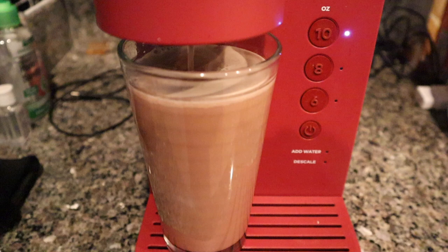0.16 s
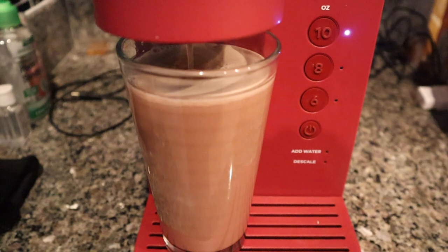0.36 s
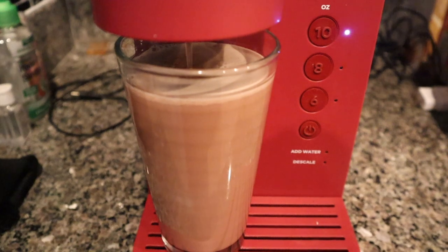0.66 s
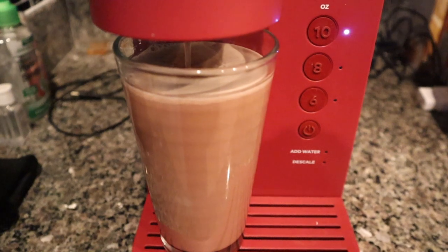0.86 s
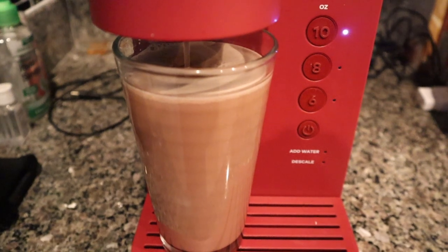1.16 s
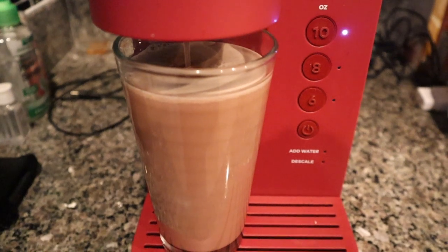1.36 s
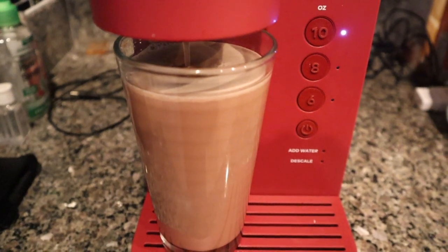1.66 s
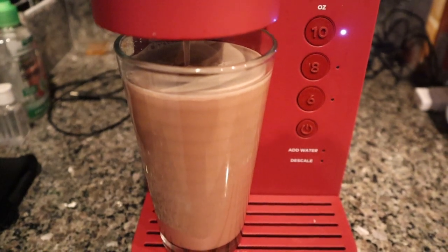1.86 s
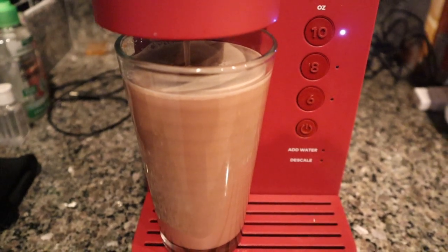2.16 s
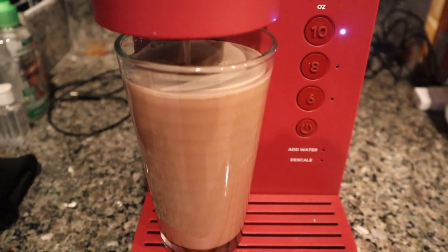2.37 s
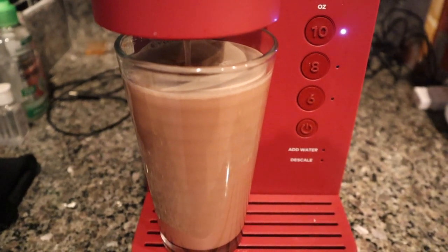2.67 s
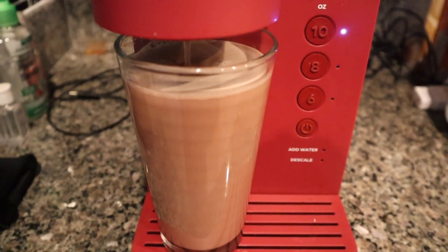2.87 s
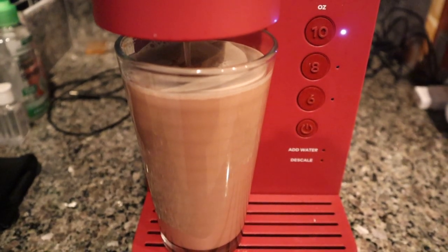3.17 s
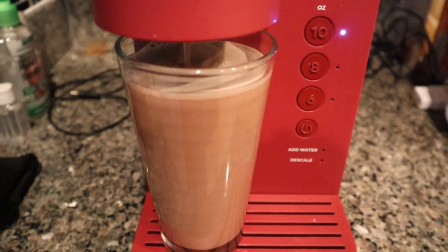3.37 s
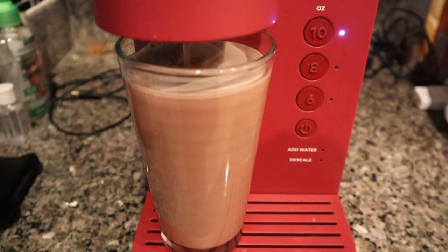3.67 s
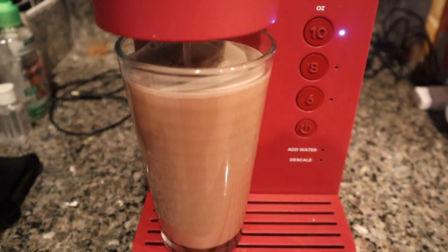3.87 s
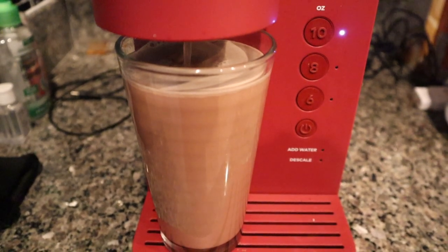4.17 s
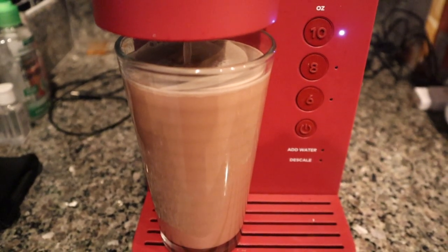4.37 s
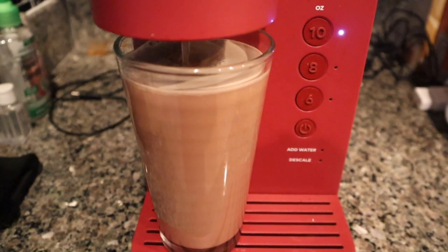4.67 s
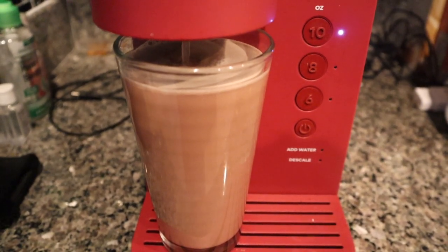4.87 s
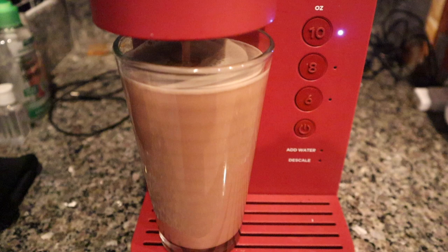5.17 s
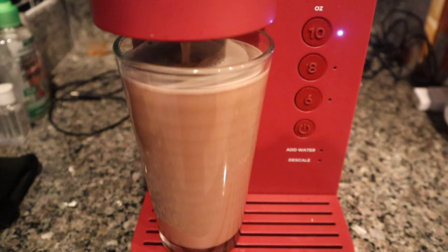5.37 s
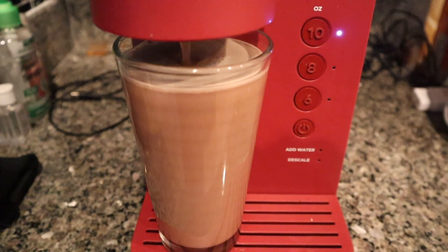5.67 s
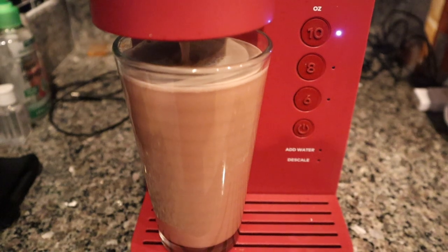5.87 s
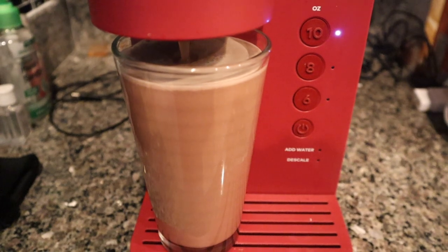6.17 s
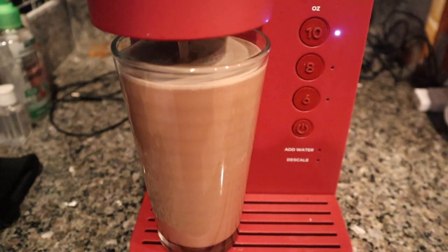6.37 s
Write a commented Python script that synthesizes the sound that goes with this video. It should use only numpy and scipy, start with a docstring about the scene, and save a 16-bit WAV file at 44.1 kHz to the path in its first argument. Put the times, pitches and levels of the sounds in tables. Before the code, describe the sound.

Close up, a coffee machine hums and dribbles drops into a glass, clicks, then whines loudly as air sputters and hisses from its spout.

```python
"""Pod coffee machine on a stone counter

A water pump with three valves knocks while the thin stream breaks into drops that tick and ring the glass.
A relay clicks, an air pump takes over with a throbbing whine, and the spout spits and gurgles.
Pumps and drops are timed clicks that ring resonances; the spout is shaped noise and short gliding tones.
The kitchen hums and rumbles behind. A two-port microphone stands close by.
"""
import sys
import numpy as np
from scipy import signal
from scipy.fft import rfft, irfft
from scipy.io import wavfile
from scipy.ndimage import uniform_filter1d

SR = 44100
rng = np.random.default_rng(int(sys.argv[2]) if len(sys.argv) > 2 else 0)


def master(y):
    """Save y as 16-bit WAV."""
    cut = np.clip(np.atleast_2d(y).T, -1, 1)
    pcm = np.round(cut * 32767)  # scale
    wavfile.write(sys.argv[1], SR, pcm.astype(np.int16))


N = 287071
T = np.arange(N) / SR  # time of every sample in seconds

# Rings of the air pump's case: pitch_hz, width_hz, level_db
AIR_CASE = [(922, 99, -1), (966, 50, 4), (1107, 104, 0), (1265, 101, -0.5), (1480, 110, -1),
            (1570, 153, -4.5), (1776, 110, -4.5)]
# Rings of loose plastic: pitch_hz, width_hz, level_db
RATTLE = [(1984, 183, 0.5), (2230, 200, 0), (2460, 83, -5), (2570, 60, -13.5)]
# Rings of the tank: pitch_hz, width_hz, level_db
BELLY = [(366, 103, -10), (558, 38, 3.5), (596, 93, 0), (763, 62, -2)]
# Gushes of air through froth at the spout: start_s, length_s, level_db
GUSHES = [(3.501, 0.99, -53.5), (4.756, 0.051, -48.5), (4.852, 0.13, -45.5), (5.014, 0.086, -37.5),
          (5.128, 0.17, -45), (5.263, 0.09, -46), (5.457, 0.041, -46), (5.541, 0.0089, -38),
          (5.61, 0.031, -37.5), (5.758, 0.041, -38), (5.834, 0.026, -40), (5.898, 0.053, -45.5),
          (6.018, 0.11, -40.5), (6.244, 0.05, -45), (6.335, 0.042, -44.5), (6.438, 0.05, -43)]


def gain_of(db):
    """Turns decibels into a gain."""
    return np.exp(np.asarray(db) * np.log(10) / 20)


def evened(x):
    """Scales a signal to rms 1."""
    return x / np.sqrt(np.mean(x ** 2) + 1e-20)


def read(points, hz):
    """Reads a spectrum table, with straight lines between its points on a log-frequency axis."""
    f, value = np.transpose(points)
    return np.interp(np.log(hz + 1), np.log(f + 1), value)


def curve(rows, count, silent=None):
    """One column of a time table at every sample; outside the table it holds or takes the silent value."""
    rows = np.array(rows)
    return np.interp(T, rows[:, 0], rows[:, count], silent, silent)


def ring(x, modes):
    """Things ring at their own pitches: two-pole resonances of alternating sign, scaled to rms 1."""
    total = 0
    for k, (hz, width, db) in enumerate(modes):
        b, a = signal.iirpeak(hz, hz / width, SR)
        total = total + (-1) ** k * gain_of(db) * signal.lfilter(b, a, x)
    return evened(total)


def slow(rate):
    """Slow chance: noise smoothed twice over 1 / rate seconds, scaled to rms 1."""
    size = int(SR / rate)
    once = uniform_filter1d(rng.standard_normal(N), size)
    return evened(uniform_filter1d(once, size))


def spread(alike):
    """Noise from a wide source: the two ports hear it only partly alike."""
    a, b = rng.standard_normal((2, N))
    alike = np.clip(alike, 0, 1)
    return np.array([a, alike * a + np.sqrt(1 - alike ** 2) * b])


def swell(s, half, db):
    """A bell-shaped rise and fall around its peak time."""
    return gain_of(db) * np.exp(-.5 * ((T - s) / half) ** 2)


def bursts(events, alike, rise):
    """Noise bursts with a quick front, each dying at its own speed."""
    shape = 0
    for s, db, t60 in events:
        fading = gain_of(db - 60 * np.abs(T - s) / t60)
        shape = shape + fading * np.clip((T - s) / rise, 0, 1)
    return shape * spread(alike)


def turns_of(speed, angle):
    """Shaft angle in turns: the summed speed, with the given angle at the table's first row."""
    turns = np.cumsum(curve(speed, count=1)) / SR
    return turns - turns[round(speed[0][0] * SR)] + angle


def knocks(turns, valves, spread_db, puff_s, puff_db, flow_db, alike):
    """A click at each valve's place in the turn, a puff of noise after it, and steady flow noise."""
    hits = 0
    for place, db in valves:
        passed = np.floor(turns - place)
        hits = hits + gain_of(db) * np.diff(passed, prepend=passed[0])
    hits = hits * gain_of(spread_db * rng.standard_normal(N))  # no two blows are equally strong
    puff_shape = signal.lfilter([1], [1, -np.exp(-1 / (puff_s * SR))], hits)
    puffs = puff_shape * spread(alike)
    return evened(hits) + gain_of(puff_db) * evened(puffs) + gain_of(flow_db) * spread(alike)


def orders(turns, table, waver_db):
    """Sines on whole multiples of the shaft speed, each swelling and fading a little."""
    total = 0
    for multiple, db in table:
        level = np.sqrt(2) * gain_of(db + waver_db * slow(9.2))
        total = total + level * np.sin(2 * np.pi * (round(multiple) * turns + rng.random()))
    return total


def kitchen():
    """Low rumble in a few room modes over a diffuse floor, and steady mains hum."""
    # Mains hum: pitch_hz, level_db
    hum_tones = [(120, -41), (240, -71.5)]
    # Room modes: pitch_hz, width_hz, relative level_db
    rumble_modes = [(59, 10.4, -6.5), (68.7, 8.7, -2), (85, 7, -7), (108.3, 9.4, -2.5), (718, 41, -24)]
    # Diffuse floor: pitch_hz, relative level_db per Hz
    floor_spectrum = [(20, -22), (45, -17), (150, -17.5), (300, -19), (700, -22.5), (1700, -25),
                      (4000, -34.5), (9000, -50), (12000, -42.5), (13500, -97), (16000, -90)]
    # Left-right likeness: pitch_hz, likeness (1 alike, 0 unrelated, -1 opposite)
    likeness = [(20, .99995), (60, .9998), (110, .999), (150, .99), (380, 0.75), (950, 0.64), (2380, -0.3),
                (5980, 0.9), (15000, -.9)]
    hz = np.fft.rfftfreq(N, 1 / SR)
    power = gain_of(read(floor_spectrum, hz)) ** 2
    for f, width, db in rumble_modes:
        power += gain_of(db) ** 2 / (1 + (2 * (hz - f) / width) ** 4)
    a, b = rfft(rng.standard_normal((2, N)))
    same = np.clip(read(likeness, hz), -1, 1)
    pair = np.array([a, same * a + np.sqrt(1 - same ** 2) * b])
    floor = evened(irfft(np.sqrt(power) * pair, N))
    hum = sum(np.sqrt(2) * gain_of(db) * np.sin(2 * np.pi * f * T) for f, db in hum_tones)
    return gain_of(-38) * floor, hum


def water_pump():
    """Three valves knock on their seats each turn; flow noise fills the case; the motor drones."""
    # Shaft speed: time_s, turns_per_s
    speed = [(0.0, 25.02), (0.42, 24.84), (0.84, 24.62), (1.26, 24.46), (1.68, 24.36), (2.1, 24.23),
             (2.52, 24.03), (2.94, 24.03), (3.07, 24.55), (3.3, 24.6), (3.4, 25.1)]
    # Valves: place_in_turn (0 to 1), level_db
    valves = [(.975, -6), (.29, -5), (.625, 0)]
    # Ring of a valve seat: pitch_hz, width_hz of one stage, level_db
    seat = [(1300, 480, 0)]
    # Rings of the case: pitch_hz, width_hz, level_db
    case_modes = [(340, 47, -12), (570, 57, 1), (693, 164, -3.5), (778, 61, 2.5), (1913, 52, -1)]
    # Running level of the whole pump: time_s, level_db
    running_level = [(0, 0), (1.5, -0.5), (3.3, -1), (3.5, 3), (3.56, -35)]
    # Motor tones: multiple of the shaft speed, level_db before the running level
    motor_tones = [(6, -46.5), (9, -58), (11, -61), (12, -62), (13, -61), (15, -55), (16, -52), (18, -57),
                   (20, -58), (21, -50), (22, -62), (23, -59), (28, -59), (29, -60), (32, -65), (35, -65),
                   (38, -65)]
    turns = turns_of(speed, angle=-.161)
    slack = .002 * slow(70)  # in turns: valves land a little early or late
    blows = knocks(turns + slack, valves, spread_db=.6, puff_s=.001, puff_db=-18, flow_db=-20, alike=.7)
    knock = ring(ring(ring(blows, seat), seat), seat)  # three stages round the knock
    filling = knocks(turns + .1, valves, spread_db=2.0, puff_s=.03, puff_db=4.1, flow_db=.17, alike=.84)
    case = ring(filling, case_modes)
    running = gain_of(curve(running_level, count=1))
    body = gain_of(-47) * knock + gain_of(-49.5) * case
    return running * body, running * orders(turns, motor_tones, waver_db=1.0)


def stream():
    """The stream pinches into drops at a wavering rate; each ticks and rings the glass."""
    # Loudness of the drops: time_s, level_db
    drop_level = [(0, -49.5), (.14, -44.5), (.17, -49), (.33, -46.5), (.45, -44), (.62, -48), (1.2, -48),
                  (1.5, -49.5), (1.84, -47), (2.18, -47.5), (2.22, -45), (2.45, -48), (3.01, -48.5),
                  (3.17, -43.5), (3.22, -47.5), (3.36, -45.5), (3.46, -51), (3.5, -46)]
    # Rings of the air above the drink and of the rim: pitch_hz, width_hz, level_db
    glass = [(2786, 44, -2), (3030, 110, -0.5), (3430, 140, -8), (4010, 160, -4.5), (4150, 120, -1.5),
             (4600, 100, -13), (5096, 92, -2), (5490, 80, -4), (6000, 71, -1), (6870, 790, -20.5)]
    # 94 drops a second at the start, .9 a second fewer each second, wandering by 2.5 percent rms
    rate = (94 - .9 * T) * (1 + .025 * slow(8))
    drops = np.cumsum(rate) / SR
    drive = knocks(drops, [(0, 0)], spread_db=2.2, puff_s=.002, puff_db=-9, flow_db=-18, alike=.5)
    tick_band = signal.butter(4, [6500, 11800], "bandpass", fs=SR, output="sos")
    tick = evened(signal.sosfilt(tick_band, drive))
    flicker_db = 2 * np.tanh(slow(51))
    level = gain_of(curve(drop_level, count=1, silent=-120) + flicker_db)
    # The unbroken part of the stream hisses in the lowest glass rings.
    pour = gain_of(-58) * (T < drop_level[-1][0]) * ring(spread(.19), glass[:2])
    return pour + level * (ring(drive, glass) + gain_of(-5.0) * tick)


def clicks():
    """Relay, creaking plastic and one hard slap of the air pump's valve: a sharp crack and a short rustle ring
    the housing."""
    # Clicks, creaks and a valve slap: start_s, relative level_db, rustle_t60_s (time to fall 60 dB)
    click_events = [(1.3215, 3, .012), (3.0745, 0, .016), (3.357, 2, .05), (3.366, -1, .045),
                    (3.406, -1, .012), (3.483, -6, .015), (5.549, 3, .015), (5.7643, -5, .025)]
    # Rings of the plastic housing, passed twice: pitch_hz, width_hz and level_db of one pass
    housing = [(520, 300, -5), (850, 500, -5), (1350, 600, 0), (2050, 700, 0), (2900, 800, -1),
               (4000, 1200, -5)]
    cracks = np.zeros(N)
    for s, db, _ in click_events:
        cracks[round(s * SR)] = gain_of(db + 8)
    rustle = bursts(click_events, alike=.99, rise=.00011)
    return gain_of(-54.5) * ring(ring(cracks + rustle, housing), housing)


def churn():
    """The starting air pump churns water: uneven quick blows ring two pockets that rise in pitch."""
    # Churning: time_s, blows_per_s, level_db, pitch as a multiple of the pocket's pitch
    churn_course = [(3.36, 105, -60, .9), (3.372, 110, -39, .92), (3.45, 118, -39, 1.0),
                    (3.5, 122, -40, 1.08), (3.54, 122, -45, 1.12), (3.6, 122, -70, 1.15)]
    # Water pockets: pitch_hz, width_hz, relative level_db
    pockets = [(560, 260, -1), (1300, 380, 1)]
    turns = np.cumsum(curve(churn_course, count=1) * (1 + .12 * slow(60))) / SR
    blows = knocks(turns, [(0, 0)], spread_db=1.5, puff_s=.003, puff_db=-3, flow_db=-9, alike=.9)
    out = 0
    for hz, width, db in pockets:
        # Shift the moving pitch down to zero, smooth there, then shift back up.
        turn = np.exp(2j * np.pi * np.cumsum(hz * curve(churn_course, count=3)) / SR)
        r = np.exp(-np.pi * width / SR)
        smooth = signal.lfilter([1], [1, -2 * r, r * r], blows / turn)
        out = out + gain_of(db) * evened((turn * smooth).real)
    return gain_of(curve(churn_course, count=2, silent=-120)) * out


def gushes():
    """Level of the gushes: each rises fast, fades by half a decibel while it lasts and dies away."""
    total = 0
    for s, length, db in GUSHES:
        fading = gain_of(db - .5 * np.clip((T - s) / length, 0, 1))
        rise = np.clip((T - s) / .0094, 0, 1)
        fall = np.exp(-np.maximum(T - s - length, 0) / .013)
        total = total + fading * rise * fall
    return total


def part_level(surges, gush, on, steady_db, drift_db, excess_db, settle, waver_db, surge_db, gush_db):
    """A part sets in, settles to a wavering level, and swells with surges and gushes."""
    since = np.maximum(T - on, 0)
    db = steady_db + drift_db * since + excess_db * np.exp(-since / settle) + waver_db * np.tanh(slow(21))
    steady = np.minimum(since / .015, 1) * gain_of(db)  # sets in over 15 ms
    return np.sqrt(steady ** 2 + (gain_of(surge_db) * surges) ** 2 + (gain_of(gush_db) * gush) ** 2)


def air_pump():
    """One strong and two weak valve slaps a turn ring a reed-like whine, case, loose plastic, tank and jet."""
    # Shaft speed: time_s, turns_per_s
    speed = [(3.86, 44.0), (4.19, 43.44), (4.52, 43.54), (4.85, 42.99), (5.18, 44.09), (5.51, 44.05),
             (5.84, 44.02), (6.17, 43.98), (6.5, 43.8)]
    # Valves: place_in_turn (0 to 1), level_db
    valves = [(.553, 0), (.889, -6), (.225, -12)]
    # How far valves land early or late: time_s, slack_turns (rms)
    slack_course = [(3.5, .009), (4.8, .007), (5.6, .0035), (6.51, .003)]
    # Main whine: pitch_hz, width_hz of one stage, level_db
    whine_modes = [(2878, 150, 0)]
    # Weaker rings beside the whine: pitch_hz, width_hz, level_db among themselves
    side_modes = [(2750, 82, 2), (3124, 45, 4), (3145, 54, 5), (2570, 53, -1)]
    # Water in the line: time_s, flow_noise_db against the slaps, whine_gain_db
    blur_course = [(3.5, -5, -1), (3.92, -5, 2), (4.08, 7, -0.5), (4.38, -15, -2), (4.45, -10, 2),
                   (4.6, 2, -3), (4.9, -13, 0.5), (6.51, -33, -0.5)]
    # Rings of the jet: pitch_hz, width_hz, level_db
    jet_modes = [(3390, 330, 3.5), (4050, 250, 4.5), (4730, 77, 2), (5660, 330, 0)]
    # Groan as the pump starts: time_s, pitch_hz, level_db
    groan_course = [(3.33, 228, -60), (3.37, 232, -61), (3.374, 227, -49), (3.438, 235.4, -41),
                    (3.478, 242, -40.5), (3.58, 236, -54)]
    # The pump catches three times: peak_s, half_width_s, level_db
    surge_table = [(3.556, 0.026, -30.5), (3.67, 0.035, -32.5), (3.77, 0.021, -37.5)]
    # Whine, case, rattle, belly, jet: start_s, steady_db, drift_db_per_s, first_excess_db, settling_s,
    # most waver_db, surge_gain_db, gush_gain_db
    parts = [(3.855, -34, -0.5, -6, 0.77, 0, -5.5, -24), (3.45, -37, -0.8, -7, 0.11, 1.5, -21, -7.5),
             (3.52, -37.5, -1, -12, 0.27, 2, -1.5, -1), (3.37, -49.5, 0.6, 11.5, 0.36, 1.5, -7.5, -2),
             (3.52, -44.5, -0.03, -1, 0.63, 3, -13, -12)]
    # What is in the line: time_s, content (0 water, 1 froth, 2 air)
    line_content = [(4.95, 0), (5.15, 1), (5.65, 1), (5.85, 2)]
    # Motor tones: multiple of the shaft speed, water_db, froth_db, air_db (while pushing each)
    motor_tones = [(9, -57, -57, -55), (11, -59, -63, -66), (12, -66, -56, -52), (13, -57, -58, -58),
                   (14, -55, -57, -57), (15, -55, -58, -55), (16, -58, -60, -52), (18, -55, -59, -48),
                   (20, -58, -50, -52), (22, -50, -52, -60), (24, -66, -57, -52), (26, -51, -56, -54),
                   (27, -56, -60, -51), (28, -55, -53, -53), (29, -55, -60, -62), (30, -54, -55, -62),
                   (31, -55, -60, -58), (32, -54, -62, -57), (33, -60, -53, -50), (34, -56, -66, -60),
                   (35, -54, -64, -56), (36, -51, -58, -48), (37, -59, -66, -61), (39, -59, -62, -54),
                   (40, -63, -66, -53), (41, -57, -61, -59), (48, -60, -64, -61), (49, -57, -58, -58),
                   (51, -60, -60, -61)]
    # Motor switching on: time_s, gain_db
    motor_start = [(3.45, -30), (3.6, -6), (3.9, 0), (6.51, 0)]
    turns = turns_of(speed, angle=-.121)

    slack = curve(slack_course, count=1) * slow(130)
    slaps = knocks(turns + slack, valves, spread_db=.6, puff_s=.002, puff_db=-12, flow_db=-16, alike=.7)
    blur = gain_of(curve(blur_course, count=1))
    slaps = (slaps + blur * spread(.7)) / np.sqrt(1 + blur ** 2)
    once = ring(slaps, whine_modes)
    whine = ring(once, whine_modes) + gain_of(-10) * once  # two stages, with some of the first leaking
    whine = gain_of(curve(blur_course, count=2)) * (whine + gain_of(-8.5) * ring(slaps, side_modes))

    # Settings in order: strength spread dB, puff s, puff dB, flow dB, likeness at the ports.
    case = ring(knocks(turns, valves, .7, .0045, 1, 2.5, .7), AIR_CASE)
    rattle = ring(knocks(turns + .65, valves, 2.5, .0044, .6, -.3, .4), RATTLE)
    belly = ring(knocks(turns + .1, valves, 1.7, .011, 4.1, 1.0, 1.0), BELLY)
    jet = ring(knocks(turns + .068, valves, 2.8, .012, 1.0, 5.8, 1.0), jet_modes)
    surges = sum(swell(*row) for row in surge_table)
    gush = gushes()
    sounds = [whine, case, rattle, belly, jet]
    layers = sum(part_level(surges, gush, *row) * x for row, x in zip(parts, sounds))

    content = curve(line_content, count=1)
    tones = [(k, np.interp(content, range(len(db)), db)) for k, *db in motor_tones]
    motor = orders(turns + .006 * slow(20), tones, waver_db=3.0)
    motor = gain_of(curve(motor_start, count=1, silent=-120)) * motor

    groan = np.sqrt(2) * np.sin(2 * np.pi * np.cumsum(curve(groan_course, count=1)) / SR)
    groan_level = gain_of(curve(groan_course, count=2, silent=-120))
    return layers + motor + churn(), groan_level * groan


def short_tone(s, half, db, hz, glide):
    """A short gliding tone that flutters; its wobble is quicker the higher it is."""
    wobble = .75 * slow(60 + hz / 15)  # phase in radians
    tone = np.cos(2 * np.pi * (hz + glide * (T - s) / 2) * (T - s) + wobble)
    return swell(s, half, db + 3 * np.tanh(slow(120))) * tone


def spout():
    """Flickering fizz and sharp spits share one colour; short gliding tones squeal through the start-up surges
    and gurgle later."""
    # Colour of fizz and spits: pitch_hz, relative level_db per Hz
    fizz_colour = [(1940, -12), (3300, 1), (4020, -5), (4830, -3), (5050, -2), (5200, 5), (5400, -4),
                   (6750, -4), (7290, -7.5), (9040, -11.5), (10600, -8), (12100, -14), (15000, -36)]
    # Spits: start_s, level_db, t60_s (time to fall 60 dB)
    spit_events = [(4.8742, -35, 0.04), (4.9555, -43, 0.04), (5.0044, -32, 0.039), (5.1186, -25.5, 0.03),
                   (5.154, -30, 0.027), (5.2044, -27.5, 0.036), (5.2576, -26, 0.024),
                   (5.4249, -28.5, 0.043), (5.4499, -25, 0.033), (5.5536, -27, 0.015), (5.614, -28, 0.036),
                   (5.64, -31, 0.027), (5.661, -42, 0.028), (5.7287, -38, 0.04), (5.7631, -15, 0.019),
                   (5.9023, -33, 0.028), (5.9906, -28, 0.036), (6.0166, -33, 0.044), (6.052, -33, 0.047),
                   (6.1144, -31, 0.031), (6.19, -22.5, 0.027), (6.2416, -33, 0.042), (6.257, -27, 0.04),
                   (6.3446, -45, 0.033), (6.4386, -34, 0.036)]
    # Air first breaks through the spout: peak_s, half_width_s, level_db
    breakthrough = (5.037, 0.02, -29.5)
    # Short gliding tones: squeals, and the whine and case singing through the start-up surges, then air pockets
    # gurgling in the line: peak_s, half_width_s, level_db, pitch_hz at the peak, glide_hz_per_s
    gurgles = [(3.54, 0.011, -29.5, 2180, -3000), (3.563, .009, -22, 2060, -2000),
               (3.555, 0.011, -25, 2910, 0), (3.671, 0.0061, -29, 2950, 0), (3.762, 0.0075, -31.5, 2900, 0),
               (3.586, .006, -42, 3450, 0), (3.555, 0.024, -41, 5550, 0), (3.59, .01, -46, 4650, 1500),
               (3.665, 0.022, -44, 5430, 0), (3.565, 0.0089, -31, 3050, 2000),
               (3.567, 0.0071, -36, 4100, 0), (3.586, 0.0047, -23.5, 2216, 0),
               (3.588, 0.016, -33.5, 1014, 0), (3.61, 0.004, -30, 2220, 0), (3.672, 0.0075, -36.5, 1010, 0),
               (3.675, 0.013, -46, 3980, 1500), (3.66, 0.015, -42, 4610, -1000), (3.7, .007, -44, 2260, -3),
               (3.725, 0.0065, -30, 2270, 0), (3.72, 0.018, -32, 1133, 0), (3.765, 0.02, -37, 1100, 0),
               (3.76, .025, -43, 2100, 0), (3.83, .008, -40, 5500, 0), (3.88, 0.043, -41, 3985, -1500),
               (3.9, 0.0074, -38, 5520, 0), (4.885, 0.0095, -34, 557, 0), (4.89, 0.013, -35, 1064, 0),
               (4.93, .015, -33, 567, 2), (4.97, 0.017, -40, 810, 0), (5.025, .012, -31, 1880, -1000),
               (5.035, 0.0096, -31, 760, 0), (5.042, 0.01, -39, 1114, 0), (5.05, 0.013, -36, 573, 0),
               (5.1, 0.011, -32, 550, 0), (5.1, 0.012, -33, 990, 0), (5.15, 0.019, -36.5, 562, 0),
               (5.31, 0.013, -27.5, 584, 0), (5.335, 0.0094, -32, 587, 2), (5.43, 0.016, -37, 1910, 0),
               (5.435, 0.017, -35, 573, 0), (5.77, 0.01, -28, 1880, 0), (6.07, .015, -31, 1910, 0),
               (6.21, 0.0089, -38, 1120, 0), (6.22, 0.015, -35, 594, 0), (6.265, 0.011, -28, 560, 0),
               (6.5, 0.012, -36, 590, 0)]
    seep = gain_of(-56) * (T > GUSHES[0][0])  # faint fizz that stays on between gushes
    fizz = (gushes() + seep) * gain_of(2.0 * slow(130)) * spread(.47)
    spits = bursts(spit_events, alike=.16, rise=.0014)
    colour = gain_of(read(fizz_colour, np.fft.rfftfreq(N, 1 / SR)))
    colour = colour / np.sqrt(np.mean(colour ** 2))
    bright = irfft(rfft(fizz + spits) * colour, N)
    splutter = ring(spread(.84), BELLY + AIR_CASE + RATTLE[:1])
    splutter = swell(*breakthrough) * gain_of(2.4 * slow(200)) * splutter
    return bright + splutter + sum(short_tone(*row) for row in gurgles)


def ports(x, lead, wet_db, t60):
    """Direct sound reaches the two ports with a phase lead; counter and walls add unlike short tails."""
    # Balance of the direct sound: pitch_hz, left_minus_right_db
    balance = [(60, 0.0), (150, 0.0), (380, -0.5), (950, 0.5), (2380, 2.0), (5980, 1.5), (15000, 1.0)]
    hz = np.fft.rfftfreq(N, 1 / SR)
    half = gain_of(read(balance, hz) / 2) * np.exp(.5j * read(lead, hz))
    direct = irfft(rfft(x) * np.array([half, 1 / half]), N)
    t = np.arange(8000) / SR
    echoes = rng.standard_normal((2, len(t))) * (rng.random((2, len(t))) < .1)  # sparse reflections
    tail = echoes * gain_of(-60 * t / t60) * (t > .002)
    wet = signal.oaconvolve(x, tail / np.linalg.norm(tail[0]), axes=1)[:, :N]
    return direct + gain_of(wet_db) * wet


def scene():
    """Hum, drone and groan arrive alike at both ports; kitchen noise is wide; the rest has two directions."""
    # Lead from the glass and the water pump: pitch_hz, left_lead_radians
    lead_drink = [(0, 0), (1380, -0.3), (2580, 2.4), (5510, 1.3), (5860, 3.0), (6120, 1.7), (7240, 2.5),
                  (14200, 3.2), (15200, -6.6)]
    # Lead from the brew head: pitch_hz, left_lead_radians
    lead_head = [(0, 0), (1550, 0.2), (2240, -4.2), (2840, -4.9), (3190, -4.3), (4650, -4.6), (5770, -4.2),
                 (6980, -3.7), (15200, -3.0)]
    floor, hum = kitchen()
    case, drone = water_pump()
    from_drink = ports(case + stream() + clicks(), lead_drink, wet_db=-11, t60=.08)
    pump, groan = air_pump()
    from_head = ports(pump + spout(), lead_head, wet_db=-11, t60=.08)
    return from_drink + from_head + floor + hum + drone + groan


def record(dry):
    """A low-pass darkens the top above 12600 Hz; then a steep band limit cuts at 15655 Hz."""
    darkened = signal.sosfilt(signal.butter(7, 12600, fs=SR, output="sos"), dry)
    band_limit = signal.firwin(511, 15655, window=("kaiser", 9), fs=SR)
    return signal.oaconvolve(darkened, band_limit[None], "same")


dry = scene()
out = record(dry)
master(out)
```